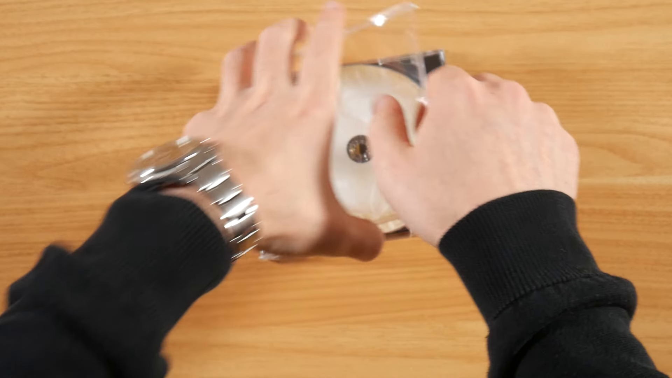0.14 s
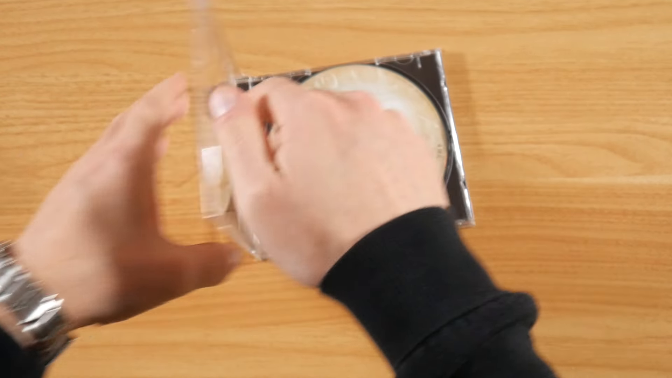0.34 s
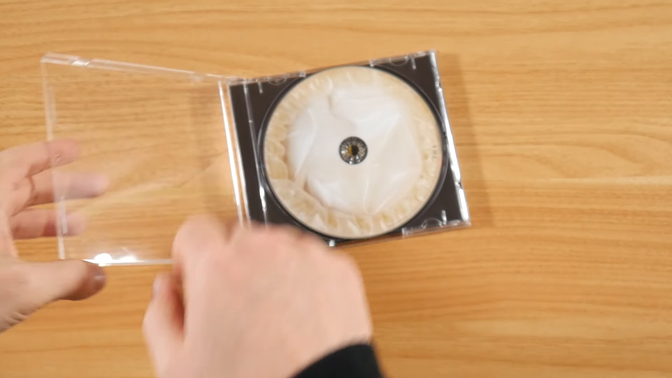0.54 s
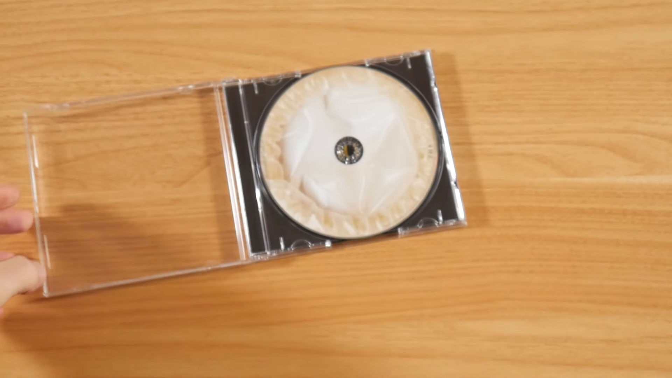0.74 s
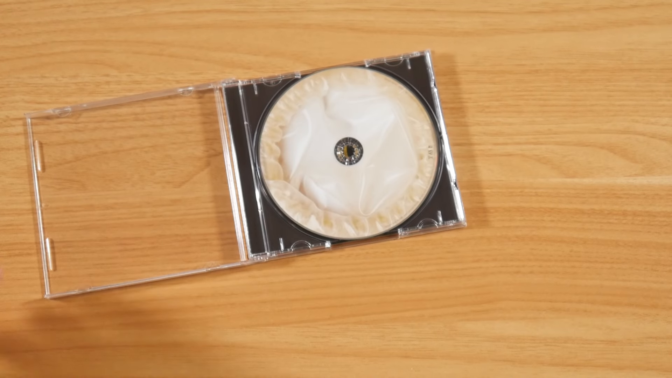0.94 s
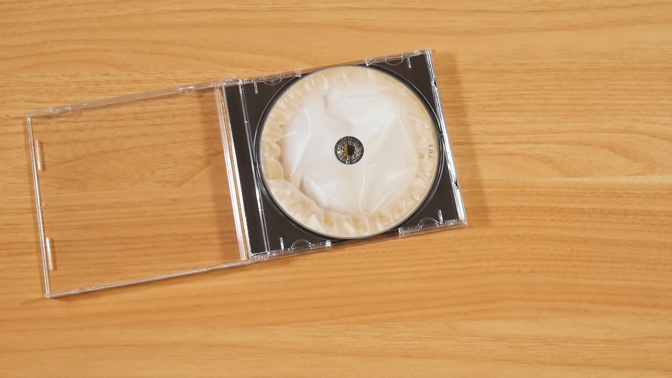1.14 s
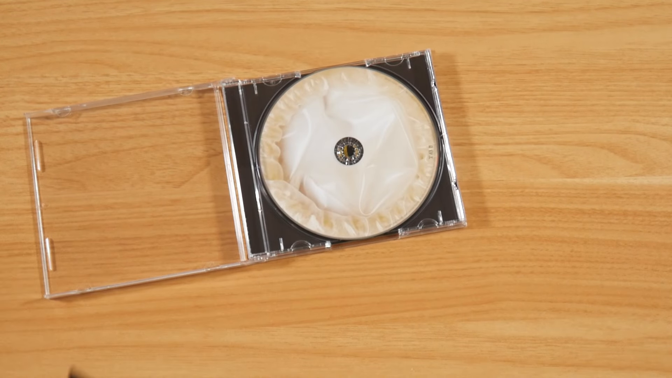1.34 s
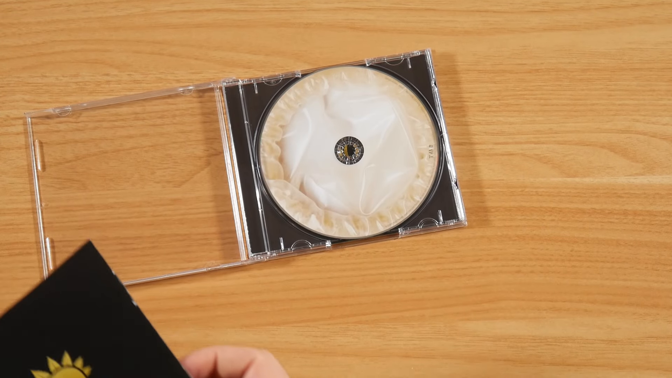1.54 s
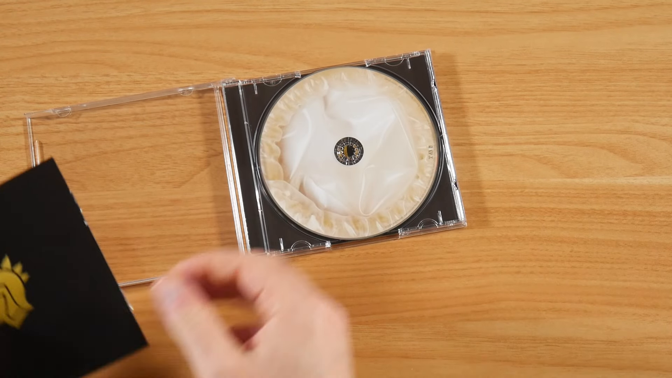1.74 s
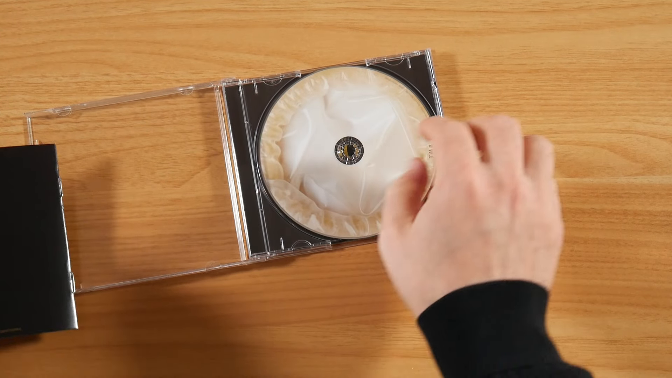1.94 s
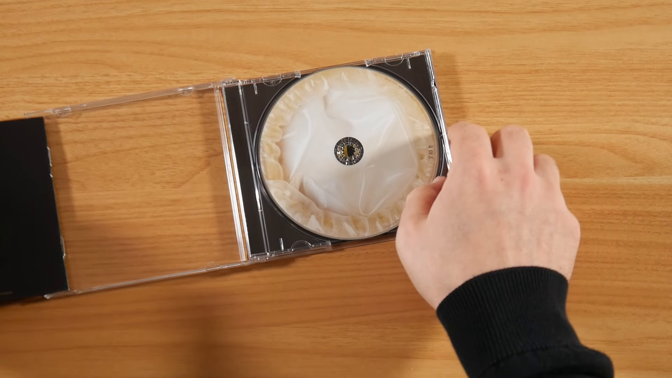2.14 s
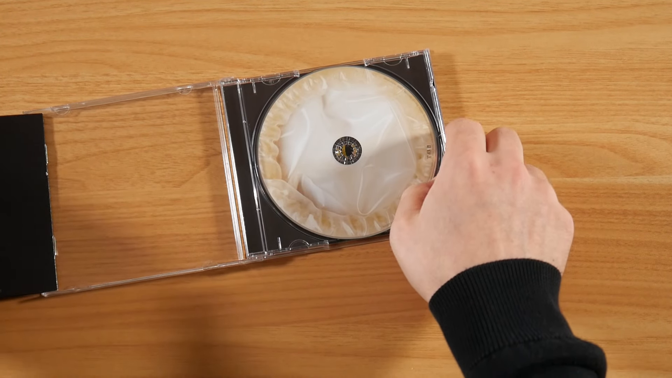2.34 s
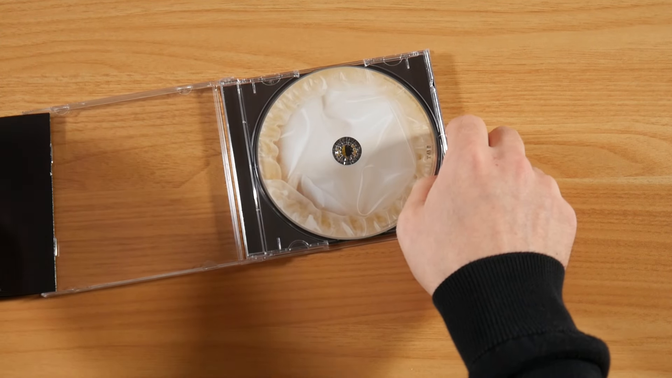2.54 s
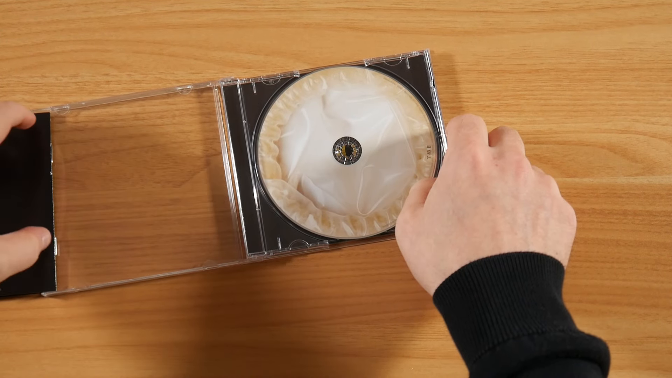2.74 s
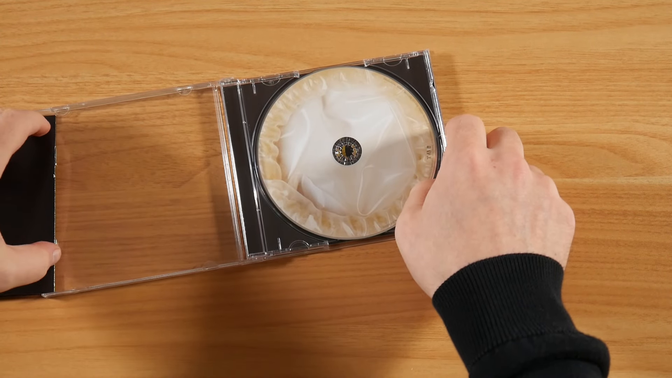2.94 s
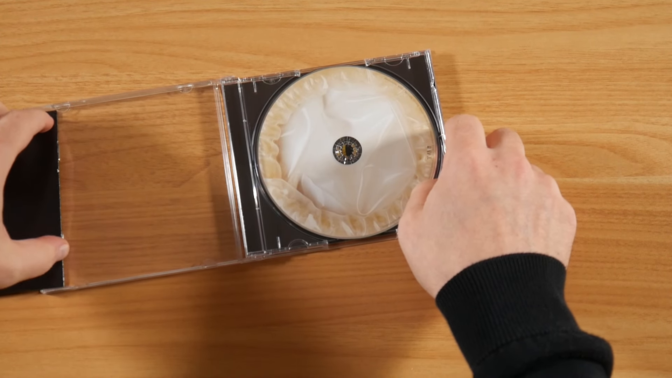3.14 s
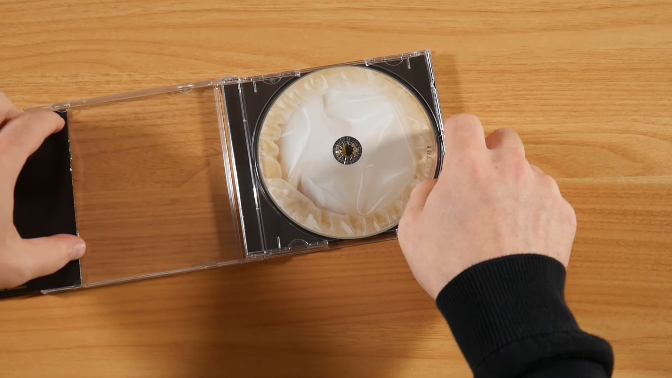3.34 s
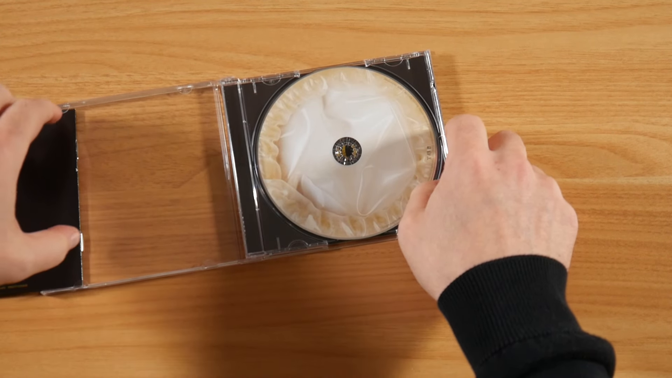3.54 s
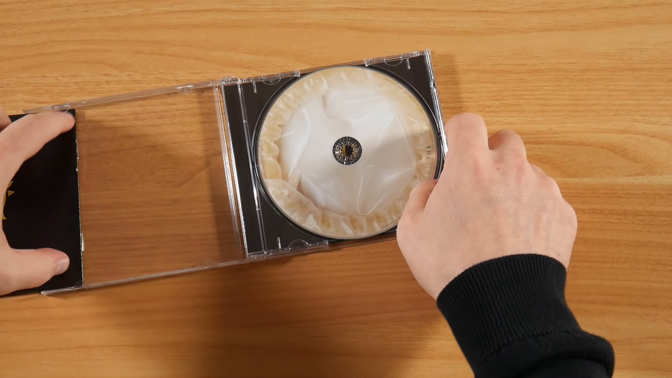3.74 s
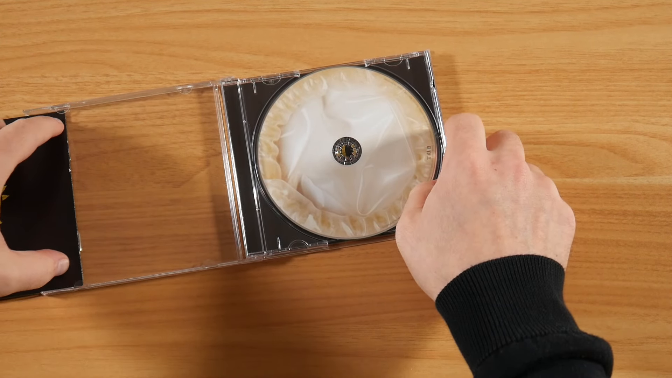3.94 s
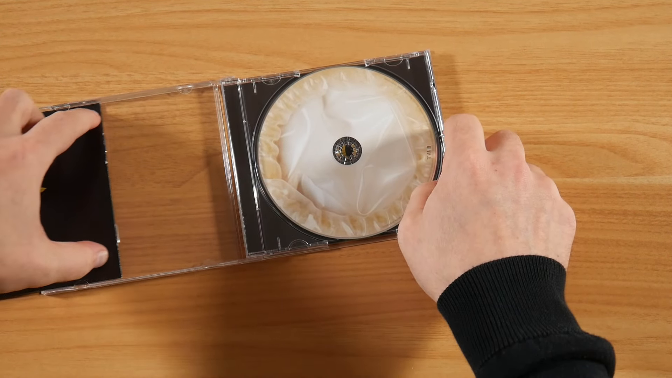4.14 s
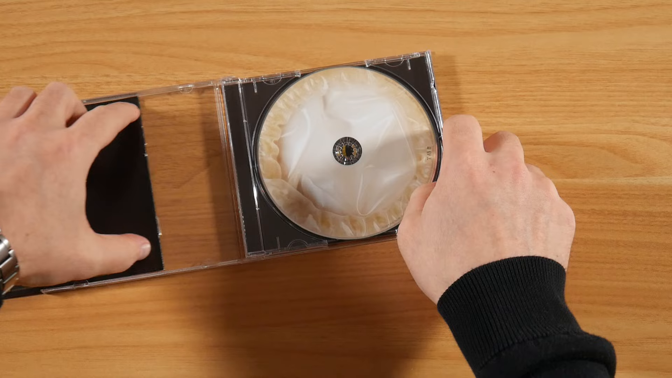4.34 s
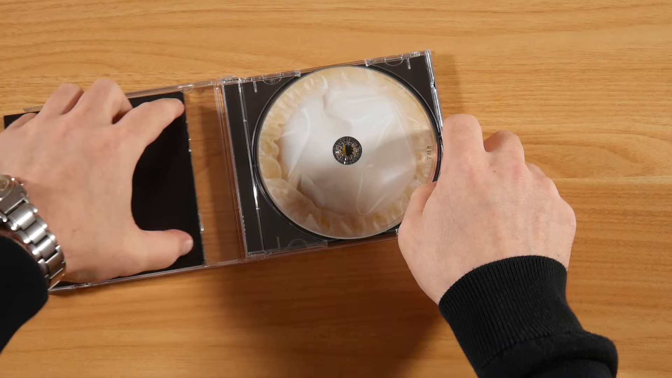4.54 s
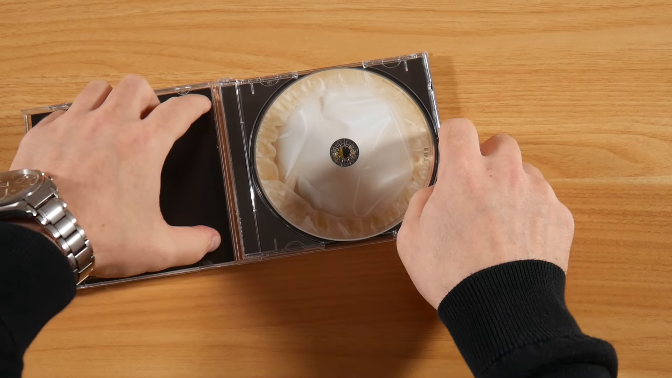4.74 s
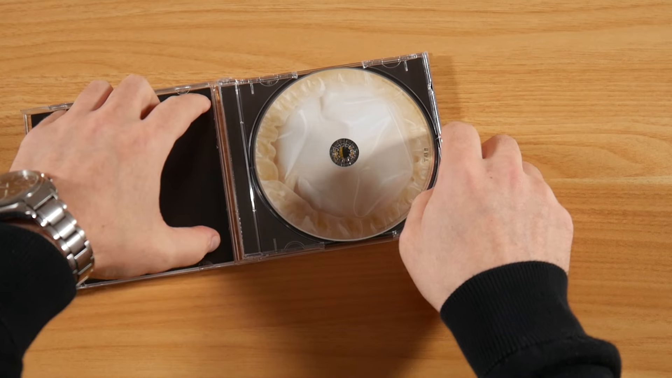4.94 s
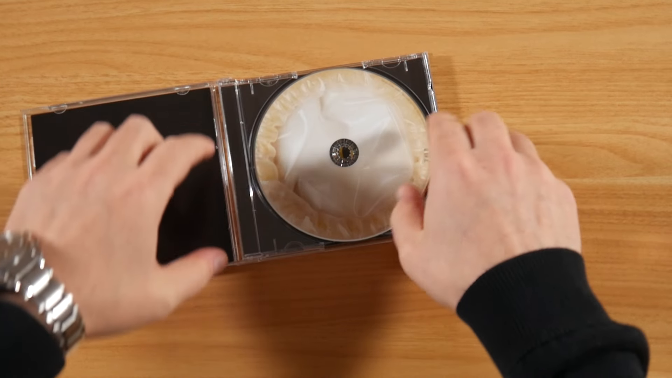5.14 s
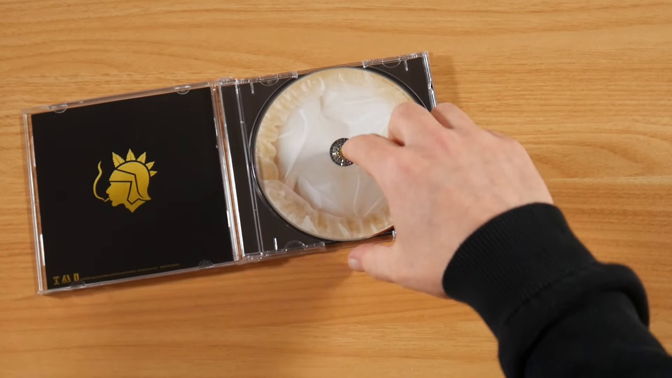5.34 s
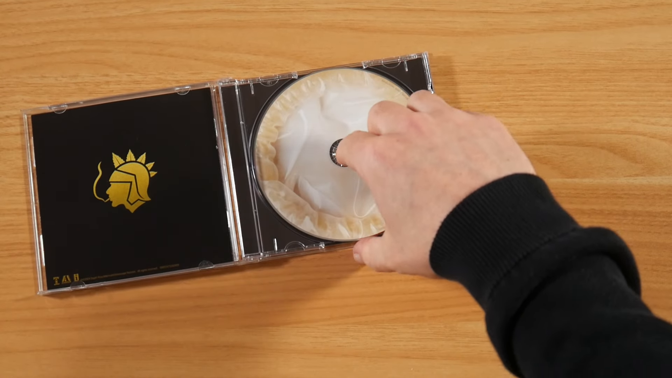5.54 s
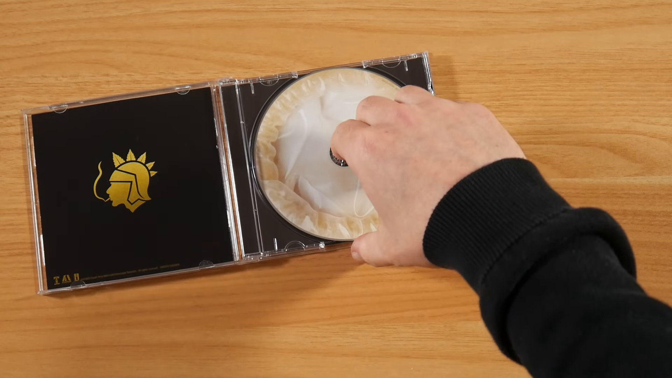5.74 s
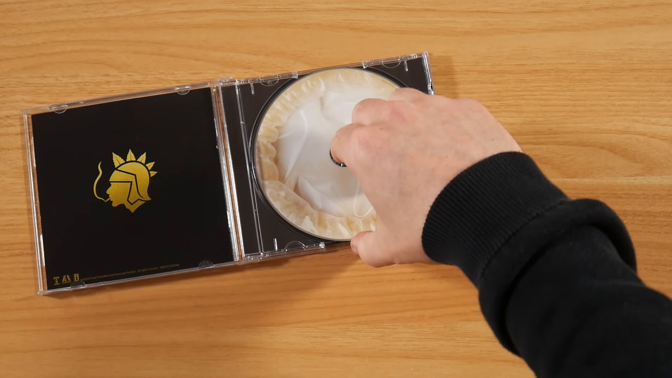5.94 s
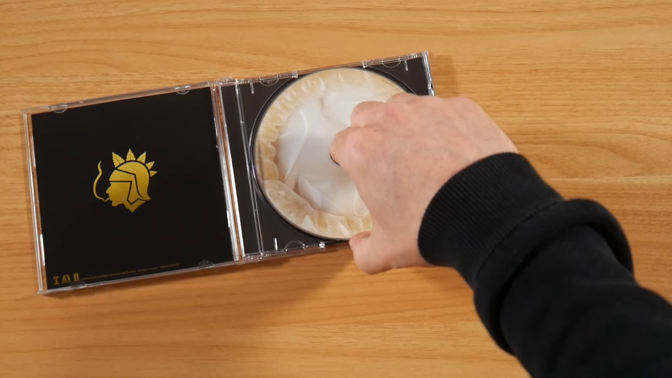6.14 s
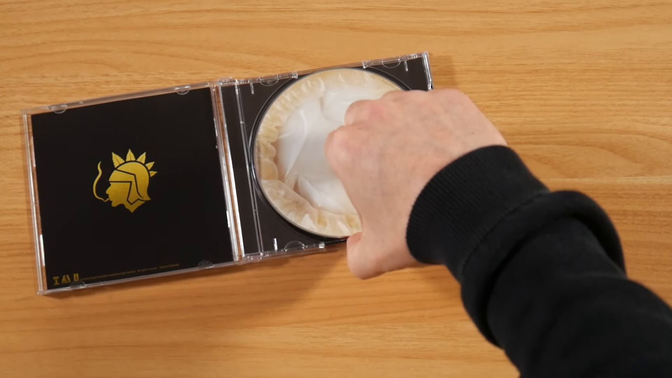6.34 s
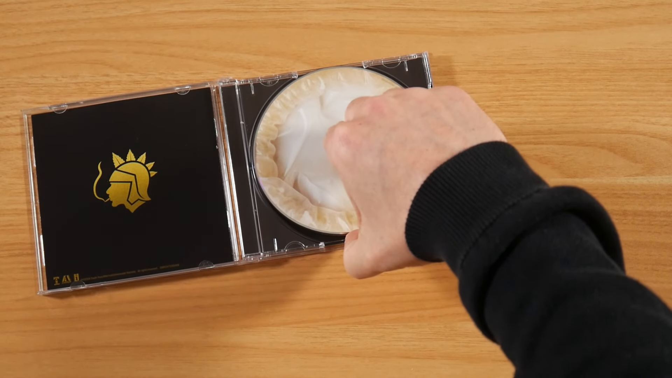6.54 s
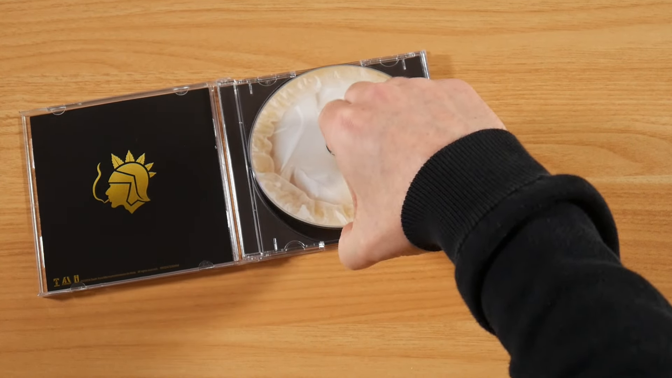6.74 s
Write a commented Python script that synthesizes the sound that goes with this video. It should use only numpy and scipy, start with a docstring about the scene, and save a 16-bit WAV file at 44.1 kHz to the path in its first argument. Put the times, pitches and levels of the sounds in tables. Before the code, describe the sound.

Very close in a small quiet room, a thin plastic case is handled on wood. Light clicks and scuffs lead to a hard bright clack as the lid opens. Smaller taps follow, then a sharp rattling double click, faint fitful paper sliding with tiny ticks, and a near pause. A very loud crack of the disc hub ends it, followed by another snap and a duller clatter over low hiss and hum.

```python
"""Plastic disc case on a wooden table

A small room, the microphone close: hands open a thin disc case, slide a paper booklet into its lid
and press the disc off its hub. Short noise chatters ring plastic and wood as clicks and thuds; grainy
noise through their resonances makes scuffs, rattles, tails after hits, pitched ringing and sliding paper.
Beneath lie microphone hiss, a wavering mains hum and a slow sway below hearing."""
import sys
import numpy as np
from scipy import signal
from scipy.fft import rfft, irfft
from scipy.io import wavfile

SR = 44100
rng = np.random.default_rng(int(sys.argv[2]) if len(sys.argv) > 2 else 0)


def to_wav(s):
    """Save 16-bit WAV."""
    ch = np.atleast_2d(s).T  # columns
    pcm = np.round(np.clip(ch, -1, 1) * 32767)  # PCM
    wavfile.write(sys.argv[1], SR, pcm.astype(np.int16))


N = 303849


def gain_of(db):
    """Amplitude factor of a level in dB."""
    return 10 ** (np.asarray(db) / 20)


def evened(x):
    """Scales to an rms of 1."""
    return x / np.sqrt(np.mean(x ** 2) + 1e-20)


def peaked(x):
    """Scales to a peak of 1."""
    return x / (abs(x).max() + 1e-20)


def add(mix, s, sound):
    """Lays a sound into the mix at s seconds, cut at the end of the mix."""
    part = mix[round(s * SR):][:len(sound)]
    part += sound[:len(part)]


def band(x, lo_hz, hi_hz):
    """Keeps what lies between two frequencies."""
    edges_hz = [lo_hz, min(hi_hz, SR / 2.1)]
    return signal.sosfilt(signal.butter(2, edges_hz, "band", fs=SR, output="sos"), x)


def resonate(x, hz, width):
    """Shifts the curve hz down to zero, smooths, and shifts back: a resonance of gain 1."""
    turn = np.exp(2j * np.pi * np.cumsum(hz * np.ones(len(x))) / SR)
    r = np.exp(-np.pi * width / SR)
    smooth = signal.lfilter([1 - r], [1, -r], x / turn)
    return 2 * (turn * smooth).real


def through(x, peaks):
    """Resonances side by side, with alternating sign."""
    out = np.zeros(len(x))
    for k, (hz, width, db) in enumerate(peaks):
        out += (-1) ** k * gain_of(db) * resonate(x, hz, width)
    return out


def ring(modes, spread_db):
    """Dying sines; where the blow lands sets how much each mode gets, here by chance."""
    t = np.arange(SR // 2) / SR
    out = np.zeros(len(t))
    for hz, db, t60 in modes:
        mode_db = db + spread_db * rng.standard_normal()
        out += gain_of(mode_db - 60 * t / t60) * np.sin(2 * np.pi * hz * t)
    return out


def coloured(points):
    """Steady noise of rms 1, its spectrum drawn through the points over log frequency."""
    hz = np.fft.rfftfreq(N, 1 / SR)
    f, level_db = np.transpose(points)
    spectrum_db = np.interp(np.log(hz + 1), np.log(f + 1), level_db, -120, -120)
    return evened(irfft(rfft(rng.standard_normal(N)) * gain_of(spectrum_db), N))


def grit(count, per_s):
    """Tiny slips of uneven size over a bed of smooth friction."""
    size_db = 5 * np.minimum(rng.exponential(1, count), 4)
    slips = gain_of(size_db) * (rng.random(count) < per_s / SR)
    return evened((evened(slips) + 1.6) * rng.standard_normal(count))


def judder(count, depth_db):
    """A gain that wanders by chance some tens of times a second."""
    return gain_of(depth_db * evened(band(rng.standard_normal(count), 12, 72)))


def push():
    """The wood takes the slower push of a blow."""
    ms = np.arange(400) / SR * 1000
    return np.exp(-ms / 1.17) * ms


# Spectrum of the microphone hiss: f/Hz, relative density/dB
HISS = [(35, -48.5), (60, -1), (78, -15.5), (103, -6.5), (371, -15), (417, -14), (492, -17.5), (785, -17),
        (1060, -23), (13300, -34), (16000, -39)]
# Spectrum of the slow sway: f/Hz, relative density/dB
RUMBLE = [(3, -24.5), (6.5, -12), (7.6, 0), (9, -9), (12, -19), (18, -36), (30, -29), (45, -43.5),
          (70, -56)]
# Level of the slow sway, wandering by chance: t/s, level/dB
SWAY = [(0.0, -34.5), (0.29, -34.5), (0.75, -42.5), (1.17, -36.5), (1.38, -40.5), (3.41, -43),
        (3.72, -36.5), (3.97, -52), (4.13, -41.5), (4.49, -32.5), (4.68, -42.5), (5.56, -40), (5.83, -52),
        (6.22, -37.5), (6.39, -51), (6.58, -28.5), (6.89, -38.5)]
HISS_DB, HUM_HZ, HUM_DB = -63.5, 50.7, -59


def floor():
    """Hiss, a wavering mains hum and a slow sway, noise mostly below hearing."""
    t = np.arange(N) / SR
    waver_db = evened(band(rng.standard_normal(N), 0.81, 9.8))
    hum = np.sqrt(2) * gain_of(HUM_DB + waver_db) * np.sin(2 * np.pi * HUM_HZ * t)
    sway = coloured(RUMBLE) * gain_of(np.interp(t, *np.transpose(SWAY)))
    return gain_of(HISS_DB) * coloured(HISS) + hum + sway


# Spectrum of the hiss unlike in left and right: f/Hz, relative density/dB
APART = [(35, -43), (60, -8.5), (593, -2), (1620, -10.5), (2470, -7.5), (13300, -4.5), (16000, -10.5)]
APART_DB = -74.5


def side_noise(heard):
    """What is opposite in left and right: hiss, and a faint fuzz that follows the sound."""
    flutter = evened(band(rng.standard_normal(N), 20, 400))
    return gain_of(-29) * flutter * heard + gain_of(APART_DB) * coloured(APART)


# Resonances of the case, the first six its body, the rest its upper modes: f/Hz, width/Hz, level/dB
CASE = [(1165, 414, -5), (1533, 44, 5.5), (2070, 360, -5), (2536, 57, -10.5), (3110, 380, -4.5),
        (3762, 560, 4.5), (4480, 300, -4.5), (5576, 890, 6), (6550, 2470, 1)]
# Modes of the wooden table: f/Hz, level/dB, t60/s
TABLE = [(217, 0, .2), (270, -4, .16), (322, -1, .2), (400, -8, .12)]


def stroke(t, db, upper_db, table_db, drag_db, fine_db):
    """Friction noise excites the modes of the case and, below them, the table."""
    rub, other = grit(len(t), 3000), grit(len(t), 3000)
    body = evened(through(rub, CASE[:6])) + gain_of(3.5) * evened(band(other, 900, 3500))
    upper = evened(through(other, CASE[6:])) + gain_of(-8) * evened(band(rub, 4300, 4900))
    table = band(signal.fftconvolve(rub, ring(TABLE, 2))[:len(t)], 200, 500)
    low_drag, fine = band(rub, 363, 810), band(rub, 8100, 12000)
    out = evened(body)
    for part_db, part in (upper_db, upper), (table_db, table), (drag_db, low_drag), (fine_db, fine):
        out = out + gain_of(part_db) * evened(part)
    return t[0], gain_of(db) * judder(len(t), 1.7) * out


# Short grainy noises, scuffs as well as the rattles and tails after hits: loudest t/s, body level/dB,
# swell/s, fade/s, then relative to the body: upper modes/dB, table/dB, fine grit/dB
GRAINY_NOISES = [(0.01, -62, .03, 0.03, -11, 12.5, -19), (0.084, -42, 0.091, 0.041, -8.5, -1, -22),
                 (0.125, -53, 0.027, 0.37, -7, 6, -21), (0.184, -66, 0.062, .3, -15, 15, -21),
                 (0.373, -47.5, 0.073, 0.042, -5, 2.5, -30), (0.415, -44.5, 0.057, 0.21, -9.5, 9, -27),
                 (0.62, -63, 0.44, 0.79, -5.5, -7, -11), (0.809, -52.5, 0.12, .03, -8, -4, -14),
                 (0.86, -40, 0.048, 0.15, 0, -6, -9), (1.04, -63.5, 0.4, 0.37, 7, -13, 2.5),
                 (1.23, -60.5, 0.3, .08, 1.5, -12.5, -3), (1.329, -50.5, 0.26, 0.12, 3, -15, -4.5),
                 (1.736, -58, 0.089, 0.064, -12.5, -3, -9.5), (2.25, -44.5, 0.042, 0.16, -3, -0.5, -11),
                 (2.43, -48, 0.096, 0.12, -4, -5, -13.5), (2.522, -52.5, .04, 0.084, -20, 2.5, -15.5),
                 (2.636, -70, 0.041, 0.11, -18, 6, -17), (2.932, -55, 0.067, 0.031, -14, -12.5, 1),
                 (5.08, -60.5, 0.056, 0.25, -6, 9, -30), (5.65, -71, .25, 0.32, 0.6, 0.5, -5.5),
                 (5.848, -69, .1, 0.11, -18.5, 3, -20), (6.181, -66, .03, .12, -3, -4, -10),
                 (6.3, -52.5, 0.022, 0.78, -2, -0.5, -23), (6.435, -34, 0.025, 0.072, -19, -6, -31),
                 (6.487, -32, 0.0053, 0.074, -5.5, -7.5, -11), (6.511, -53.5, 0.023, 0.13, -16, -1.5, -27),
                 (6.75, -55, 0.013, 0.033, -20.5, -7, -21), (6.79, -57, .05, 0.051, -9.5, 0, -19)]
GRAINY_SPAN_DB = 30  # swell and fade cross this span
DRAG_UNDER_TABLE_DB = -4


def grainy_noise(s, db, swell_s, fade_s, upper_db, table_db, fine_db):
    """Friction noise that swells to its loudest moment and fades, both straight in dB."""
    # at least 1.2 times the swell and the fade, rounded up to tenths of a second
    start = max(s - np.ceil(swell_s * 12) / 10, 0)
    end = s + np.ceil(fade_s * 12) / 10
    t = np.arange(start, end, 1 / SR)
    shape_db = -GRAINY_SPAN_DB * np.maximum((s - t) / swell_s, (t - s) / fade_s)
    return stroke(t, db + shape_db, upper_db, table_db, table_db + DRAG_UNDER_TABLE_DB, fine_db)


# The small room's reverberation: f/Hz, t60/s, relative level/dB
ROOM = [(150, 0.24, 5), (500, 0.4, 1.5), (1530, 0.32, 0.5), (4200, 0.37, -2.5), (8300, 0.24, 1),
        (15000, 0.5, -7)]


def room(x):
    """Sparse taps of random sign, one in every 20 samples, each band dying at its own speed."""
    taps = np.zeros(SR)
    at = np.arange(180, SR - 20, 20) + rng.integers(0, 20, (SR - 181) // 20)
    taps[at] = rng.choice([-1., 1.], at.shape)
    hz, t, z = signal.stft(taps, SR, nperseg=256)
    points_hz, *columns = np.transpose(ROOM)
    t60, db = (np.interp(np.log(hz + 1), np.log(points_hz), c)[:, None] for c in columns)
    tail = signal.istft(z * gain_of(db - 60 * t / t60), SR, nperseg=256)[1]
    return signal.fftconvolve(x, tail / np.linalg.norm(tail))[:N]


# Clicks and knocks: t/s halfway through the build-up, plastic's peak level/dB, ringing f/Hz,
# ring level within the plastic/dB, then relative to the plastic: table thud/dB, panel knock/dB,
# edge tick/dB; last, build-up/ms
HITS = [(0.0371, -45, 1820, 5, 3, 2.5, -25, 0.74), (0.0853, -26, 1610, 14, -23, -9.5, -34, 2.26),
        (0.1739, -37, 1450, 0, -1, -5, -29, .6), (0.369, -33.5, 1690, 18, -19, -11, -35, 0.72),
        (0.403, -28.5, 1880, 15, -24, 0, -32, 0.54), (0.4101, -23.5, 1940, 3, -24, -0.5, -40, 2.27),
        (0.4737, -33, 1420, 6, -24, -18, -19, 0.63), (0.818, -19, 3700, 1, -31, -22, -13, 1.62),
        (0.829, -8, 3640, 0, -40, -23, -4, 2.63), (0.842, -20, 3680, 1, -36, -27, -10, 2.3),
        (1.2429, -25.5, 1330, 5, -26.5, -10.5, -23, 0.53), (1.486, -44.5, 5530, 6, -18, -8, -17, .55),
        (1.711, -36, 2430, 3, -29, -7, -2, 0.55), (1.727, -35.5, 3680, -1, -26, -6, -7, 0.22),
        (1.7586, -38, 3020, -2, -32, -26, -33, 0.39), (2.0583, -33.5, 3630, -11, -9.5, 1, -26, 0.58),
        (2.1209, -30, 3720, 5, -26, -30, -26, 0.35), (2.2256, -14, 3600, -6, -44, -11, -21, 2.15),
        (2.2308, -11.5, 3700, -5.5, -27, -34, -8, 0.62), (2.5018, -25.5, 2020, -9, -23, -19, -5, 0.62),
        (2.5134, -32, 2290, 1, -23, -11, -29, 0.37), (2.8574, -47.5, 1940, -1, -19, -9, -19, 0.35),
        (2.9088, -40.5, 1790, 3, -28, -14, -12, 0.49), (2.9339, -35.5, 1850, -16, -33, -30, -16, 0.46),
        (3.5433, -39, 3880, 6, -30, -27, -3, 0.47), (3.802, -42, 3730, 1.5, -22, -23, -21.5, 0.34),
        (3.8205, -43, 3400, -1, -29, -19.5, -26, 0.43), (3.986, -37, 1800, 12, -25, -2, -29, 0.36),
        (4.2767, -33, 5570, 10, -35, -38, -28, 0.41), (4.349, -24.5, 3340, -.6, -39, -12, -28, .55),
        (4.6429, -38, 6700, -12, -29, -18, -2, 0.58), (4.695, -46, 4660, -6, -14, -3, -6, .45),
        (4.795, -32.5, 5610, 16, -33, -18, -29, .55), (5.045, -48, 1430, -11, -14, -1, 0, 0.38),
        (5.0684, -28.5, 3160, -8, -26, -13, -14, 0.43), (5.5722, -46.5, 3550, -5.5, -19, -14, -15.5, 0.51),
        (6.0762, -37.5, 3680, 4, -42.5, -22, 5, 0.53), (6.1599, -30.5, 6130, -3, -36.5, -21, 1.5, .7),
        (6.2825, 2, 3210, 6.5, -32, -31, -25, 0.27), (6.416, -25, 5500, 0, -32, -31, -14, .6),
        (6.4184, -5.5, 3050, -2.5, -32.5, -22, -19, 1.3), (6.4888, -17.5, 2260, 7, -11.5, -7, -25, 1.495),
        (6.497, -19, 1830, -5, -10.5, -43, -2.5, 0.69), (6.7409, -27, 3400, -5, -29, -27, -24, 0.32)]
# Modes of the flat panels: f/Hz, level/dB, t60/s
PANEL = [(518, -7, 0.13), (610, -4.5, 0.07), (731, 3, 0.04), (920, 2, 0.064), (1086, -13.5, 0.42)]
# A slow landing also rattles longer
CHATTER_MS, CHATTER_PER_BUILD_UP = 0.77, 2.52


def hit(s, db, hz, ring_db, thud_db, knock_db, tick_db, rise_ms):
    """A short chatter of contacts rings the plastic and its flat panels; a push rings the table."""
    ms = np.arange(SR // 10) / SR * 1000
    chatter_ms = CHATTER_MS + CHATTER_PER_BUILD_UP * rise_ms
    build_up = 1 - np.exp(-(ms / rise_ms) ** 2)
    chatter = rng.standard_normal(len(ms)) * np.exp(-ms / chatter_ms) * build_up
    chatter[round(rise_ms * SR / 1000)] += 2.5  # the first firm contact

    plastic = gain_of(ring_db) * peaked(resonate(resonate(chatter, hz, 900), hz, 900))
    plastic += gain_of(0.5) * peaked(through(chatter, CASE))
    plastic += gain_of(-1.5) * peaked(band(chatter, 1000, 5000))
    thud = band(signal.fftconvolve(ring(TABLE, 2), push()), 195, 700)
    knock = signal.fftconvolve(ring(PANEL, 2), chatter[:800])
    tick = band(chatter * np.exp(-ms / 4), 6000, 14000)

    out = gain_of(thud_db) * peaked(thud)
    add(out, 0, gain_of(knock_db) * peaked(knock))
    add(out, 0, peaked(plastic) + gain_of(tick_db) * peaked(tick))
    return s - rise_ms / 2000, gain_of(db) * out


# Pitched bands of friction noise, and the ringing of the disc around its snap:
# start t/s, end t/s, first f/Hz, last f/Hz, width/Hz, level before swell, fade and judder/dB
PITCHED_BANDS = [(0.076, 0.104, 3580, 3600, 130, -45.5), (0.041, .14, 970, 930, 36, -55),
                 (0.058, 0.27, 1620, 1680, 220, -59), (0.399, 0.43, 950, 900, 77, -34.5),
                 (0.489, 0.598, 540, 506, 19, -52.5), (0.726, .86, 1645, 1680, 21, -58.5),
                 (0.983, 1.101, 3530, 3700, 680, -53.5), (1.106, 1.223, 2900, 2900, 330, -61.5),
                 (1.218, 1.38, 1660, 1560, 130, -55), (1.266, 1.365, 5670, 5400, 610, -50.5),
                 (2.393, 2.466, 1820, 1810, 91, -54), (3.053, 3.5, 1700, 1750, 470, -62.5),
                 (3.49, 3.563, 1900, 1882, 290, -59), (3.808, 3.932, 1960, 1930, 300, -60.5),
                 (4.019, 4.253, 1801, 2120, 350, -55.5), (4.056, 4.345, 3620, 3500, 300, -58),
                 (4.44, 4.591, 2870, 3800, 520, -49.5), (4.438, 4.823, 1182, 1030, 150, -57),
                 (6.281, 6.43, 3270, 3240, 110, -41), (6.284, 6.38, 3070, 3110, 90, -46),
                 (6.291, 6.384, 2410, 2370, 220, -42.5), (6.281, 6.287, 1610, 1550, 260, -19.5),
                 (6.29, 6.372, 1490, 1530, 160, -43.5), (6.421, 6.504, 3150, 3130, 110, -41),
                 (6.747, 6.81, 3730, 3610, 79.2, -61)]


def pitched_band(start, end, first_hz, last_hz, width, db):
    """Grainy noise in one steep gliding resonance that swells and fades."""
    count = round((end - start) * SR)
    hz = np.linspace(first_hz, last_hz, count)
    sung = resonate(resonate(grit(count, 1500), hz, width), hz, 4 * width)
    return start, gain_of(db) * judder(count, 2) * evened(sung) * signal.windows.tukey(count, .5)


# The weight of a hand or the case makes the floor boom: t/s, peak level/dB
THUMPS = [(0.403, -61), (0.831, -56), (1.243, -54), (2.51, -61), (3.83, -52.5), (3.986, -58), (4.349, -58),
          (6.16, -59), (6.284, -39.5), (6.418, -44), (6.49, -32)]
# Low modes under the table: f/Hz, level/dB, t60/s
BOOM = [(122, 0, .5), (154, -2, .25)]


def thump(s, db):
    """A push rings the low modes under the table."""
    return s, gain_of(db) * peaked(signal.fftconvolve(ring(BOOM, 2), push()))


# The loose lid buzzes while the case is dragged: t/s, level/dB
DRAG = [(2.06, -43.5), (2.112, -46), (2.122, -39), (2.138, -44.5), (2.226, -39)]
# Narrow resonances of the lid: f/Hz, width/Hz, level/dB
LID = [(1640, 35, -5), (2520, 23, -6.5), (2690, 39, -1.5), (3190, 110, -8.5), (3790, 70, 0),
       (4540, 52, -24), (4950, 42, -18), (5170, 48, -8), (5690, 33, -21), (5700, 40, -7), (6180, 52, -17),
       (6240, 67, -19), (7540, 54, -32), (8140, 47, -19), (8510, 41, -29), (9150, 120, -27.5)]


def drag(rows):
    """Friction in the narrow modes of the lid."""
    s, db = np.transpose(rows)
    t = np.arange(s[0], s[-1], 1 / SR)
    sung = evened(through(grit(len(t), 2700), LID))
    # broad rubbing around the modes: relative dB, slips per second, band in Hz
    for part_db, per_s, lo_hz, hi_hz in ((-7, 2700, 1980, 6200), (-17.5, 3000, 255, 1700),
                                         (-19.5, 3060, 7000, 15000)):
        sung += gain_of(part_db) * evened(band(grit(len(t), per_s), lo_hz, hi_hz))
    return s[0], gain_of(np.interp(t, s, db)) * evened(sung) * signal.windows.tukey(len(t), .05)


# The booklet is pushed along the lid in fits: t/s, rubbing level/dB, upper modes relative to it/dB
SLIDE = [(3.019, -117, 2), (3.071, -58.5, -8), (3.208, -61.5, -6.5), (3.268, -65.5, -3.5), (3.408, -55, -6),
         (3.454, -75.5, -6), (3.539, -51.5, -4), (3.57, -74, -7), (3.63, -90, -7), (3.79, -88, -6),
         (3.82, -59.5, -2.5), (3.9, -59.5, -1.5), (3.964, -84, -17), (3.995, -64, -15), (4.015, -60, -7),
         (4.057, -57, -0.8), (4.191, -57.5, 3), (4.329, -59, 3), (4.36, -43.5, -12), (4.406, -53.5, -0.2),
         (4.518, -58, 5), (4.658, -52, -2), (4.722, -62, 6.5), (4.742, -54.5, -6.5), (4.79, -62, 1),
         (4.843, -79, -8), (4.867, -75, 13), (4.94, -86, 8)]
SLIDE_TABLE_DB, SLIDE_DRAG_DB = -13.5, -14  # relative to the rubbing
SLIDE_GRIT_DB = -7  # relative to the upper modes


def slide():
    """Paper rubs along the lid: one long stroke of changing level and brightness."""
    s, *columns = np.transpose(SLIDE)
    t = np.arange(s[0], s[-1], 1 / SR)
    db, upper_db = (np.interp(t, s, c) for c in columns)
    return stroke(t, db, upper_db, SLIDE_TABLE_DB, SLIDE_DRAG_DB, upper_db + SLIDE_GRIT_DB)


def scene():
    """Sounds close to the microphone, their room, the noise floor and a nearly mono stereo image."""
    near = np.zeros(N)
    for source, rows in ((hit, HITS), (thump, THUMPS), (grainy_noise, GRAINY_NOISES),
                         (pitched_band, PITCHED_BANDS)):
        for row in rows:
            add(near, *source(*row))
    add(near, *slide())
    add(near, *drag(DRAG))
    heard = near + gain_of(-11) * room(near)
    side = side_noise(heard)
    mid = heard + floor()
    return np.array([mid + side, mid - side])


EDGE_HZ = 16150


def record(dry):
    """The loudest snap just overloads; then the band limit."""
    lowpass = signal.firwin(511, EDGE_HZ, window=("kaiser", 9), fs=SR)
    return signal.oaconvolve(np.clip(dry, -.97, .97), lowpass[None], "same")


dry = scene()
out = record(dry)
to_wav(out)
```